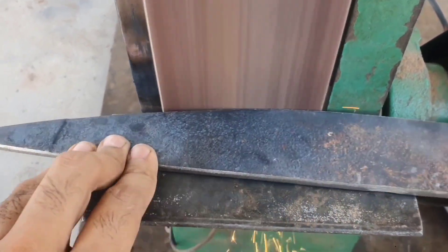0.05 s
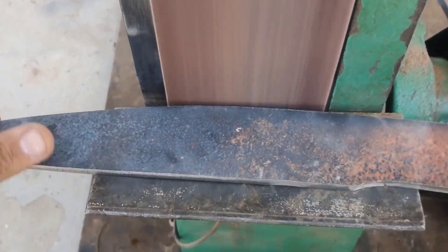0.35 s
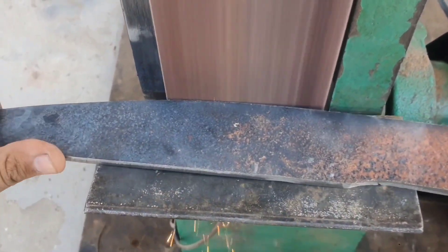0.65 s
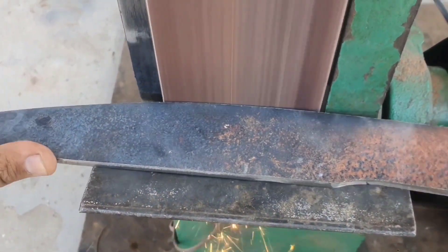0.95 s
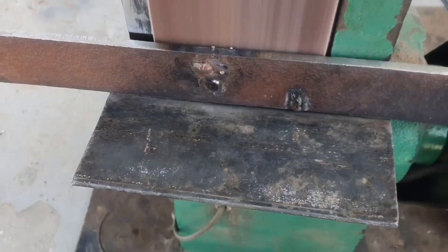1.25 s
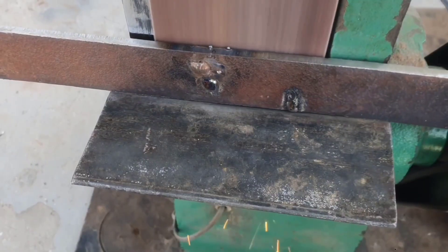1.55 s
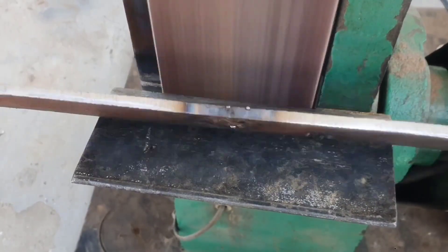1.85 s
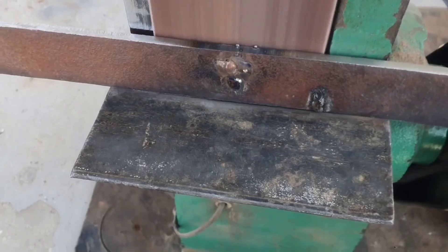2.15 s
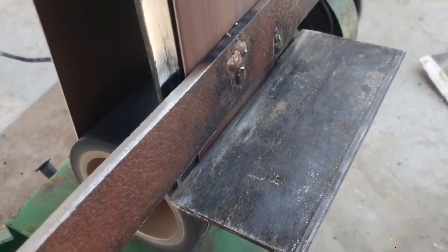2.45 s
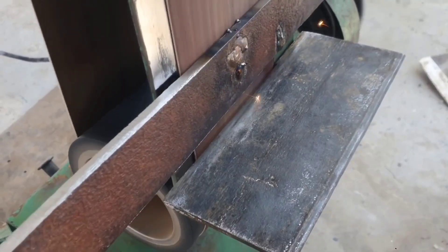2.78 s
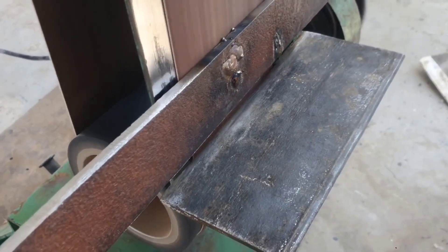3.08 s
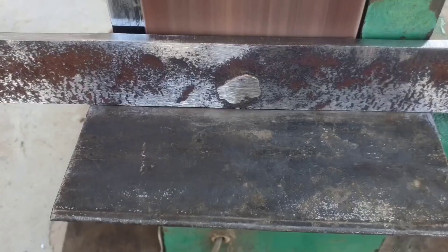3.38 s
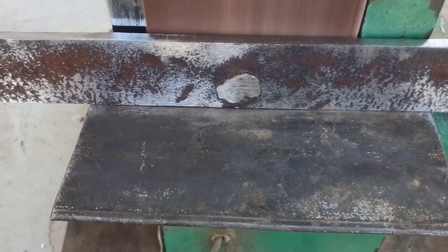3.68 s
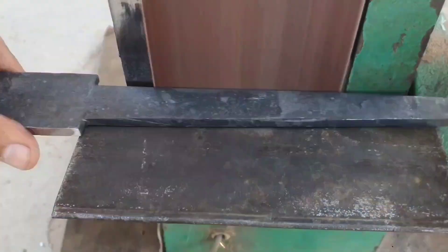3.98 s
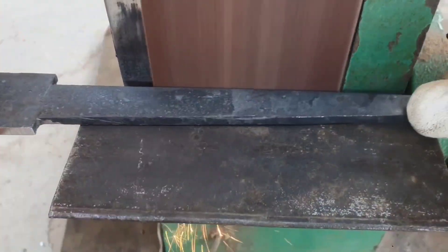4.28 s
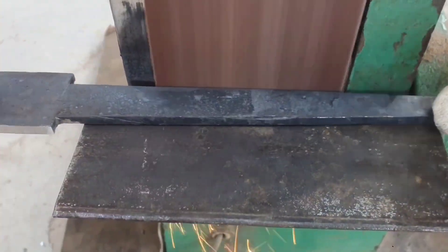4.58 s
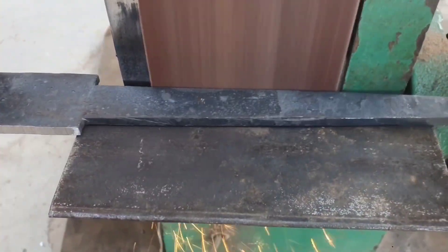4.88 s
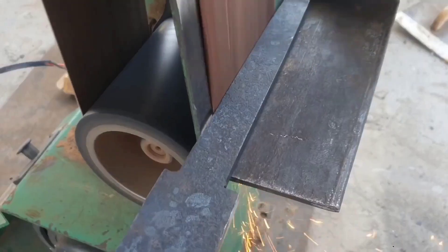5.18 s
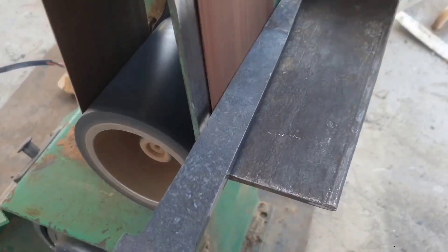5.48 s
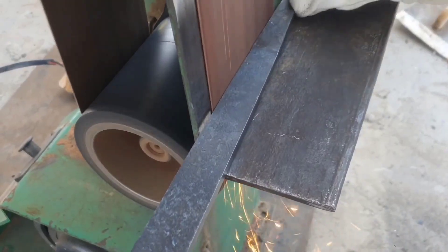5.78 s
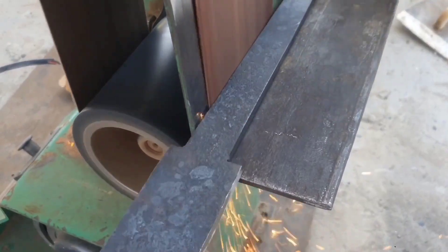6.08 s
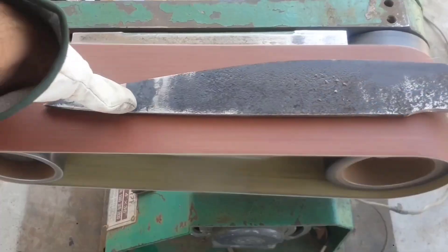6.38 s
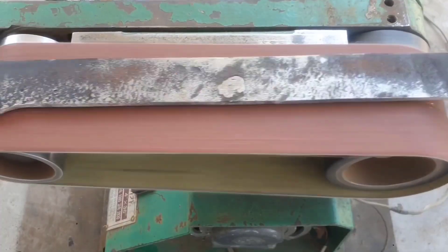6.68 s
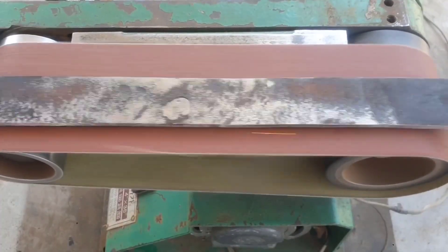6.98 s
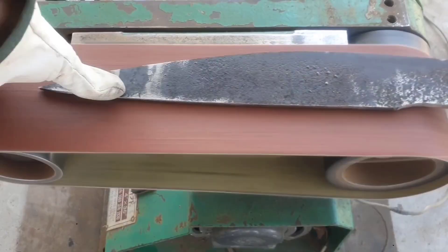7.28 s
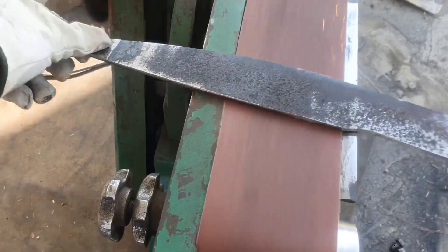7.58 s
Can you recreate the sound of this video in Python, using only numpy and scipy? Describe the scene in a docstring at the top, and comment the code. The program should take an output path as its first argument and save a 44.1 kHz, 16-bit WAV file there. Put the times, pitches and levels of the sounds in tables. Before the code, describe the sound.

Steel is ground on a running belt grinder, hissing and squealing with brief drops, then turning to a brighter hiss.

```python
"""Workshop, at a belt grinder. Steel is pressed into the upright belt over the work rest, touched to it
edge-on, laid on the flat run, then held across the belt. Abrasive grains tear at the steel in a rasping
hiss that throbs with each turn of the drive wheel. Friction makes the steel squeal and growl in its
resonances; the sound drops whenever the hand eases off. The machine's frame rumbles underneath."""
import sys
import numpy as np
from scipy import signal
from scipy.fft import rfft, irfft, next_fast_len
from scipy.io import wavfile
from scipy.ndimage import uniform_filter1d

SR = 44100
rng = np.random.default_rng(int(sys.argv[2]) if len(sys.argv) > 2 else 0)


def wav_out(sig):
    """Save sig, one row per channel (or a flat mono array), as 16-bit PCM at SR to the path in sys.argv[1]."""
    wavfile.write(sys.argv[1], SR, np.round(np.clip(np.atleast_2d(sig).T, -1, 1) * 32767).astype(np.int16))


N = 341334
TIME_S = np.arange(N) / SR
EDGE_START_S, FLAT_START_S, PAUSE_START_S, PAUSE_END_S = 5.2, 6.25, 7.484, 7.53

# presses into the upright belt: start_s, end_s, attack_s, fine_db, rasp_db, squeal_db, squeal_hz,
# squeal_pan_db, upper_mode_db, first_bite_db
PRESSES = [(0, 0.252, 0.0089, -33.5, -32, -21, 3134, 5, -7.5, -1.5),
           (0.493, 0.625, 0.032, -34, -30.5, -19, 3147, 5.5, -3.5, 10.5),
           (0.65, 0.727, 0.042, -31, -35, -30, 3150, 3, 1, -1.5),
           (0.744, 0.937, 0.038, -31, -29, -23.5, 3150, 7, -11, 0),
           (0.95, 1.262, .02, -33.5, -28.5, -21.5, 3145, 8, -8.5, -1),
           (1.277, 1.322, .014, -37, -35.5, -40, 3140, 10, -9, 2),
           (1.334, 1.704, .016, -28, -30, -21.5, 3200, 12, -9, 8.5),
           (1.999, 2.068, 0.17, -32.5, -29.5, -25.5, 3040, 10, -28, -5),
           (2.081, 2.417, 0.013, -29.5, -31, -21, 3176, 11.5, -12, 5.5),
           (2.436, 2.69, 0.031, -23.5, -29.5, -37, 3240, 1, -12, -9.5),
           (2.729, 3.485, 0.11, -25, -27, -30.5, 3210, -27, -9, 3.5),
           (3.492, 3.803, 0.046, -26.5, -28, -29, 3186, 17, -12.5, 2),
           (3.824, 4.058, 0.014, -39.5, -32.5, -31, 3035, 17, -29, 2),
           (4.099, 4.605, 0.068, -29.5, -26.5, -25.5, 3160, 11, -8, -0.5),
           (4.623, 5.187, 0.027, -30, -27.5, -24.5, 3170, 10, -11, 0)]
# between presses: fine_db, rasp_db, squeal_db, squeal_hz, squeal_pan_db, upper_mode_db
RESTING = (-46.5, -41, -37, 3065, 8, -17)
# position of the grinding point: time_s, pan_db
CONTACT_PAN = [(.6, 1), (1.1, 4.5), (2.6, 1.8), (5.2, 4)]
# light touches of the bar's edge: start_s, end_s, hiss_db, squeal_db
TOUCHES = [(5.2, 5.272, -40.5, -38.5), (5.29, 5.325, -41, -32), (5.34, 5.42, -40.5, -37.5),
           (5.44, 5.485, -38, -39), (5.605, 5.64, -37, -39), (5.65, 5.725, -40, -31.5),
           (5.74, 5.762, -42.5, -53), (5.865, 6.005, -37, -38.5), (6.02, 6.21, -38, -45)]
# swells: start_s, end_s, level_db
GROWLS = [(.11, .24, -30), (.49, .525, -27), (.6, .64, -27.5), (.82, .93, -25.5), (1.12, 1.18, -30),
          (1.42, 1.68, -37), (2.11, 2.35, -35), (2.74, 3.2, -35), (3.25, 3.43, -30.5), (4.195, 4.24, -27.5),
          (4.3, 4.6, -33), (4.7, 4.77, -27), (4.8, 4.92, -27.5), (5.0, 5.18, -35), (6.025, 6.21, -31)]  # steel falls into its lower mode
SURGES = [(6.285, 6.36, -28.5), (6.58, 6.63, -28), (6.68, 6.74, -28.5), (6.99, 7.08, -29),
          (7.285, 7.33, -27.5), (7.43, 7.455, -29.5)]  # blade bites deeper into the flat run
MOANS = [(7.67, 7.7, -37)]  # blade moans across the belt
# steel shakes its support: start_s, end_s, drone_db, rumble_rise_db
JUDDERS = [(.1, .18, -36, -1), (.48, .51, -35, 7), (.81, .96, -29.5, 6), (1.96, 2.035, -30, 8),
           (2.05, 2.068, -31.5, 12.5), (2.44, 2.455, -32, 8), (3.44, 3.8, -34.5, -0.5),
           (4.04, 4.085, -30, 2.5), (4.19, 4.28, -32.5, -3.5), (4.66, 4.95, -32.5, -1),
           (5.12, 5.18, -32, 1.5), (5.235, 5.275, -41.5, -8), (5.43, 5.47, -55, 0),
           (5.71, 5.735, -45.5, 10), (5.91, 5.95, -41.5, -5), (6.035, 6.205, -35, -4),
           (6.41, 6.46, -39, -2), (6.53, 6.61, -44.5, 1), (7.03, 7.08, -44, 11), (7.23, 7.28, -45.5, 2),
           (7.375, 7.44, -42, -2)]
# impacts on the belt: start_s, level_db
LANDINGS = [(.484, -11), (2.435, -31), (3.984, -22), (4.605, -28), (7.542, -21), (7.551, -27)]
SKIPS = [(0.18, -12), (5.279, -20), (5.290, -31), (5.369, -23), (5.397, -22), (5.663, -25)]
# briefly excited bending modes: peak_s, pitch_hz, level_db
GLINTS = [(1.06, 4280, -27), (2.45, 956, -34.5), (5.66, 4560, -38.5), (6.345, 5520, -28.5),
          (6.35, 6730, -32), (7.31, 3850, -32.5)]
# machine rumble: time_s, level_db
RUMBLE_LEVEL = [(0, -52.5), (1.8, -53), (2.6, -49), (3.3, -49.5), (3.7, -46), (5.17, -48), (5.24, -67),
                (5.4, -53), (5.53, -61.5), (7.52, -68), (7.58, -50.5)]

# noise spectra: freq_hz, density_db
FINE_SPECTRUM = [(3000, -23), (6500, -1), (9000, 0), (11300, -2.5), (13000, 2), (15500, 0)]
RASP_SPECTRUM = [(700, -31.5), (1500, -5), (2600, 3.5), (4000, 4.5), (5500, 1.5), (7000, -2.5),
                 (10000, -6.5), (15000, -73)]
DRONE_SPECTRUM = [(250, -28), (500, -12), (750, -5.5), (1000, 0), (1170, 2), (1450, 3.5), (1900, -3),
                  (3000, -9), (6000, -45)]
EDGE_SPECTRUM = [(700, -12), (1800, -4.5), (2700, -4), (3800, 0.5), (5200, -1), (6300, -3), (8000, -2.5),
                 (11500, -12.5), (13500, -3), (15500, -12)]
FLAT_SPECTRUM = [(1000, -21.5), (3000, -24), (5000, -0.5), (8000, -10.5), (9500, -.5), (12000, 2),
                 (15500, 0.5)]
BITE_SPECTRUM = [(800, -27), (1600, -15.5), (2250, -9), (2700, 2.5), (3300, -4), (4300, 1.5), (5500, -5),
                 (7000, 1.5), (10000, -17), (15000, -25)]
ACROSS_SPECTRUM = [(500, -21), (1700, -11), (2250, -7), (2700, 0), (3500, 2.5), (4000, -9), (4500, 3),
                   (5400, -2), (6300, 0.5), (10000, 0), (13000, 6.5), (15500, 1)]
RUMBLE_SPECTRUM = [(20, 1), (60, -3), (130, -3), (300, 2), (500, 1.5), (1000, 2.5), (3000, -51)]
# resonances of workpiece, work rest and frame: freq_hz, width_hz, relative_db
BAR_MODES = [(3735, 140, -12), (4320, 85, -18), (4910, 190, -16)]
EDGE_MODES = [(3750, 150, -11), (5030, 440, -10.5), (6870, 150, -21.5), (7830, 160, -16.5)]
BLADE_MODES = [(5300, 260, -15), (6730, 170, -14), (8100, 720, -3)]
ACROSS_MODES = [(201, 22, -34), (337, 13, -24), (8200, 470, -8.5)]
REST_MODES = [(1120, 230, -11)]
FRAME_MODES = [(123, 75, -12)]
# left-right likeness of the noise: freq_hz, correlation
COHERENCE = [(60, 0.52), (300, .45), (700, 0.76), (1400, 0.53), (3100, 0.046), (7000, 0.064),
             (15000, 0.018)]


def upright_belt(throb):
    """Bar on the work rest: cutting hiss, drone of the rest, squeal and growl of the steel."""
    fine_db, rasp_db, squeal_db, squeal_hz, squeal_pan_db, upper_db = hand_pressure()
    load_db = rasp_db + 30  # above the usual rasp
    drone_db, _ = judder_levels(-39.5 + 0.26 * load_db)
    idle_growl_db = -42.5 + 0.83 * load_db
    growl_db = growl_level(idle_growl_db)
    squeal_db = squeal_db - 0.073 * (growl_db - idle_growl_db)  # growl steals from squeal
    pan_db = curve(CONTACT_PAN)
    cutting = grains(throb, throb_db=0.2, rough_db=2.0, per_s=5500, size_db=6.5, share=0.19)
    tearing = grains(throb, throb_db=-0.17, rough_db=1.5)
    shaking = grains(throb, throb_db=1.5, rough_db=2.5)
    sticking = grains(throb, throb_db=1.0, rough_db=1.5)
    fine = from_db(fine_db + hand_waver(1.2)) * pan(colour(cutting, FINE_SPECTRUM), pan_db * 0.8)
    upper_mode = from_db(upper_db + hand_waver(2.5)) * pan(resonate(cutting, 5610, 210), 0.65)
    rasp_gain = from_db(rasp_db + hand_waver(1.5))
    bar_ring = ringing(shaking, BAR_MODES, wander_db=3.5)
    rasp = rasp_gain * pan(colour(tearing, RASP_SPECTRUM) + bar_ring + upper_mode, pan_db)
    rest_ring = ringing(cutting, REST_MODES, wander_db=3.5)
    drone = from_db(drone_db) * pan(colour(shaking, DRONE_SPECTRUM) + 1.24 * rest_ring, 0.81)
    looseness = np.clip((-22 - squeal_db) / 10, 0, 1)  # a weak squeal has not locked on: pitch flutters
    squeal_hz = squeal_hz * (1 + 0.023 * looseness * drift(500))
    squeal = friction_mode(sticking, squeal_hz, width_hz=115, skirt_hz=430, apart=0.27, lead_rad=1.2)
    growl = friction_mode(sticking, 2150, width_hz=240, skirt_hz=650, apart=0.35, lead_rad=0.6)
    growl = from_db(growl_db + 1.5 * drift(12)) * pan(growl, 4.8)
    squeal = from_db(squeal_db + hand_waver(0.83)) * pan(squeal, squeal_pan_db)
    return (fine + rasp + drone + squeal + growl) * gate(0, EDGE_START_S)


def flat_belt(throb, lying_db=-31, landing_s=0.035):
    """Blade face down, damped by the belt: bright hiss, coarser where it bites."""
    bite_db, = held(SURGES, [lying_db], attack_s=0.012, release_s=0.012)
    hiss_db = -25.5 + 0.15 * (bite_db - lying_db) + hand_waver(0.7)
    drone_db, _ = judder_levels(idle_db=-49.5)
    cutting = grains(throb, throb_db=1.3, rough_db=0.5, per_s=7000, size_db=2.5, share=0.28)
    tearing = grains(throb, throb_db=0.8, rough_db=-0.5)
    scrape = colour(tearing, BITE_SPECTRUM) + ringing(cutting[::-1], BLADE_MODES, wander_db=3.5)
    # the blade rocks: a shifting echo from the gap beneath hollows the scrape
    gap_s = 0.00052 * (1 + 0.16 * drift(9))
    scrape = steady(scrape + 0.45 * np.array([delay(side, gap_s) for side in scrape]))
    hiss = from_db(hiss_db) * pan(colour(cutting, FLAT_SPECTRUM), 1.3)
    bite = from_db(bite_db + hand_waver(0.5)) * pan(scrape, 7.6)
    hum = friction_mode(tearing, 880, width_hz=150, skirt_hz=700, apart=0.55)
    drone = from_db(drone_db) * pan(colour(cutting, DRONE_SPECTRUM) + 0.5 * hum, 4.2)
    landing = from_db(-25 * ramp_down(FLAT_START_S, landing_s))
    return (hiss + bite + drone) * landing * gate(FLAT_START_S, PAUSE_START_S)


def edge_touch(throb):
    """Lightly held bar chatters: thin hiss, stuttering squeal, then a growl that shakes the rest."""
    hiss_db, squeal_db = held(TOUCHES, [-50, -59], attack_s=0.03, release_s=0.017)
    drone_db, _ = judder_levels(idle_db=-60)
    cutting = grains(throb, throb_db=1.3, rough_db=1.5, per_s=2900, share=0.25)
    shaking = grains(throb, throb_db=1.4, rough_db=2.2)
    chatter = grains(throb, throb_db=3.5, rough_db=1.0)
    overtones = ringing(shaking, EDGE_MODES, wander_db=2.5)
    hiss_gain = from_db(hiss_db + hand_waver(0.7, rate_hz=50))
    hiss = hiss_gain * pan(colour(cutting, EDGE_SPECTRUM) + overtones, 0.99)
    rest_ring = friction_mode(chatter, 1090, width_hz=210, skirt_hz=480, apart=0.35, lead_rad=0.3)
    drone = from_db(drone_db) * (0.28 * colour(shaking, DRONE_SPECTRUM) + 0.9 * rest_ring)
    squeal = friction_mode(chatter, 3236, width_hz=130, skirt_hz=550, apart=0.37)
    growl = friction_mode(chatter, 2134, width_hz=110, skirt_hz=430, apart=0.34, lead_rad=0.8)
    squeal = from_db(squeal_db) * pan(squeal, 26)
    growl = from_db(growl_level(idle_db=-67)) * pan(growl, 1.2)
    return (hiss + drone + squeal + growl) * gate(EDGE_START_S, FLAT_START_S)


def blade_across(throb, settle_s=0.065):
    """Blade held at one end across the belt: hiss, low hum, high ring, a brief moan."""
    hiss_db = -24 - 7.5 * ramp_down(PAUSE_END_S, settle_s)
    moan_db, = held(MOANS, [-59], attack_s=0.047, release_s=0.047)
    cutting = grains(throb, throb_db=-0.5, rough_db=1.5)
    ring = ringing(cutting[::-1], ACROSS_MODES, wander_db=1)
    hiss = pan(colour(cutting, ACROSS_SPECTRUM), 1.5) + pan(ring, 5.4)
    moan = friction_mode(cutting, 1350, width_hz=260, skirt_hz=700, apart=0.29)
    return (from_db(hiss_db) * hiss + from_db(moan_db) * moan) * gate(PAUSE_END_S, np.inf)


def grains(throb, throb_db, rough_db, per_s=6000, size_db=3.5, share=0.14):
    """Small grains hiss; large ones crack, with `share` of the power. Both follow the contact force."""
    hits = rng.random(N) < per_s / SR
    sizes = from_db(size_db * np.minimum(rng.exponential(1, N), 5))
    cracks = hits * sizes * rng.standard_normal((2, N))
    scratch = np.sqrt(share) * cracks / cracks.std() + np.sqrt(1 - share) * rng.standard_normal((2, N))
    knots_s = TIME_S[::50]
    roughness = np.interp(TIME_S, knots_s, rng.standard_normal(len(knots_s)))
    return scratch * from_db(throb_db * throb + rough_db * roughness)


def friction_mode(force, pitch_hz, width_hz, skirt_hz, apart, lead_rad=0.61, saturation=0.12):
    """Friction rings one bending mode in ragged bursts; the left side leads in phase."""
    carrier = np.exp(2j * np.pi * np.cumsum(pitch_hz * np.ones(N)) / SR)
    sides = np.array([[1], [-1]])
    mode_pole, skirt_pole = np.exp(-np.pi * np.array([width_hz, skirt_hz]) / SR)
    drive = force[0] + apart * force[1] * sides
    swing = signal.lfilter([1 - mode_pole], [1, -mode_pole], drive / carrier)
    swing = swing / (np.abs(swing) + 1e-12) ** saturation  # friction feeds weak swings, curbs strong ones
    swing = signal.lfilter([1 - skirt_pole], [1, -skirt_pole], swing)
    return steady((swing * carrier * np.exp(0.5j * lead_rad * sides)).real, window_samples=900)


def ringing(force, modes, wander_db):
    """Modes swell and fade as the contact slides along the steel."""
    return sum(resonate(force, freq_hz, width_hz) * from_db(level_db + wander_db * drift(7))
               for freq_hz, width_hz, level_db in modes)


def wheel_throb(wheel_hz=76.3, unevenness=0.7):
    """A high spot on the wheel pushes the belt into the steel once a turn; unit spread."""
    turns = np.cumsum(wheel_hz * (1 + 0.011 * drift(3) + 0.042 * drift(70))) / SR
    push = np.exp(np.cos(2 * np.pi * turns)) * (1 + unevenness * drift(60))
    return (push - push.mean()) / push.std()


def hand_pressure(wear_s=0.042):
    """Presses rise, hold and let go; as the first bite wears smooth, hiss gives way to squeal."""
    holds = [(start_s, end_s, *values) for start_s, end_s, _, *values, _ in PRESSES]
    attacks_s = np.array([press[2] for press in PRESSES])
    fine_db, rasp_db, squeal_db, *mode_curves = held(holds, RESTING, attacks_s, release_s=0.022)
    bite_db = sum(db * gate(start_s - attack_s / 2, end_s) * np.exp(-np.abs(TIME_S - start_s) / wear_s)
                  for start_s, end_s, attack_s, *_, db in PRESSES)
    return fine_db + bite_db, rasp_db, squeal_db - 0.41 * bite_db, *mode_curves


def hand_waver(spread_db, rate_hz=22):
    """Level wander from an unsteady hand, in dB."""
    return spread_db * drift(rate_hz)


def growl_level(idle_db):
    """Level of the steel's lower mode, in dB."""
    return held(GROWLS, [idle_db], attack_s=0.022, release_s=0.025)[0]


def judder_levels(idle_db):
    """Steel shakes its support: drone level and rumble rise, in dB."""
    return held(JUDDERS, [idle_db, 0], attack_s=0.046, release_s=0.039)


def landing_knocks(decay_s=0.0039):
    """Steel lands on the belt: a short, harsh burst of grains."""
    envelope = sum(from_db(level_db) * (TIME_S >= start_s) * np.exp(-np.abs(TIME_S - start_s) / decay_s)
                   for start_s, level_db in LANDINGS)
    noise = rng.standard_normal((2, N))
    return envelope * pan(colour(noise, RASP_SPECTRUM) + 0.68 * colour(noise, FINE_SPECTRUM), 3) / 2


def skip_pings(pitch_hz=3190, decay_s=0.0061):
    """Each skip on the belt rings the bending mode once."""
    pings = np.zeros(N)
    for start_s, level_db in SKIPS:
        age_s = np.maximum(TIME_S - start_s, 0)
        envelope = from_db(level_db) * np.exp(-np.minimum(age_s / decay_s, 20))
        pings += envelope * np.sin(2 * np.pi * pitch_hz * age_s)
    return pan(pings, 16)


def glints(width_ratio=0.033, swell_s=0.03):
    """The sliding contact passes points where another bending mode rings up and fades."""
    force = rng.standard_normal((2, N))
    rings = np.zeros((2, N))
    for peak_s, pitch_hz, level_db in GLINTS:
        swell = from_db(level_db) * np.exp(-((TIME_S - peak_s) / swell_s) ** 2)
        rings += swell * resonate(force, pitch_hz, width_ratio * pitch_hz)
    return pan(rings, 7.5)


def plate_echoes(x, delays_s=(0.0013, 0.0021, 0.0034), gain=0.27, sway=0.045):
    """Rest, platen and frame are small and reflect only treble; the paths shift as the work moves."""
    echoes = [sum(delay(side, lag_s * (1 + sway * drift(3))) for lag_s in delays_s) for side in x]
    return gain * signal.sosfilt(signal.butter(2, 3800, "high", fs=SR, output="sos"), echoes)


def frame_rumble(throb):
    """The running machine rumbles, and booms when the steel shakes it hard."""
    _, rise_db = judder_levels(idle_db=0)
    level_db = curve(RUMBLE_LEVEL) + rise_db
    shaking = grains(throb, throb_db=2.5, rough_db=1.5)
    boom = from_db(1.8 * (level_db + 43)) * ringing(shaking[[0, 0]], FRAME_MODES, wander_db=1.5)
    return from_db(level_db) * pan(colour(shaking, RUMBLE_SPECTRUM) + boom, -7.5)


def colour(x, spectrum):
    """Shape two unrelated signals into a unit-rms pair, alike in the bass, apart in the treble."""
    size = next_fast_len(N)
    freqs_hz = np.maximum(np.fft.rfftfreq(size, 1 / SR), 1)
    mid, side = rfft(x, size) * from_db(at_hz(spectrum, freqs_hz))
    correlation = at_hz(COHERENCE, freqs_hz)
    mid, side = mid * np.sqrt(1 + correlation), side * np.sqrt(1 - correlation)
    return steady(irfft([mid + side, mid - side], size)[:, :N])


def resonate(x, freq_hz, width_hz):
    """Two-pole resonance, levelled."""
    radius = np.exp(-np.pi * width_hz / SR)
    feedback = [1, -2 * radius * np.cos(2 * np.pi * freq_hz / SR), radius ** 2]
    return steady(signal.lfilter((1 - radius ** 2) / 2 * np.array([1, 0, -1]), feedback, x))


def held(rows, idle, attack_s, release_s):
    """One curve per value of (start_s, end_s, values...) rows: glide from idle, hold, glide back."""
    curves = np.array([value * np.ones(N) for value in idle])
    for (start_s, end_s, *values), rise_s in zip(rows, attack_s * np.ones(len(rows))):
        span = slice(*np.searchsorted(TIME_S, [start_s - rise_s, end_s + release_s]))
        inside = np.minimum((TIME_S[span] - start_s) / rise_s, (end_s - TIME_S[span]) / release_s)
        curves[:, span] += np.clip(1 + inside, 0, 1) * (np.array(values)[:, None] - curves[:, span])
    return curves


def steady(x, window_samples=2600):
    """Hold a pair's mid signal at rms 1, keeping fast flutter."""
    return x / np.sqrt(np.abs(uniform_filter1d(x.mean(axis=0) ** 2, size=window_samples)) + 1e-20)


def pan(x, left_db):
    """Lean a pair left at constant power."""
    gains = from_db([left_db / 2, -left_db / 2]).reshape(2, -1)
    return x * gains / np.sqrt(np.mean(gains ** 2, axis=0))


def drift(rate_hz):
    """Random wander, unit spread."""
    knots = rng.standard_normal(8000)
    return np.interp(TIME_S * rate_hz, np.arange(len(knots)), knots) * np.sqrt(3 / 2)


def gate(start_s, end_s):
    """Gate with 2 ms edges."""
    return uniform_filter1d(((TIME_S >= start_s) & (TIME_S < end_s)) * 1.0, size=100)


def ramp_down(start_s, length_s):
    return np.clip(1 - (TIME_S - start_s) / length_s, 0, 1)


def delay(x, delay_s):
    return np.interp(TIME_S - delay_s, TIME_S, x)


def curve(points):
    return np.interp(TIME_S, *np.transpose(points))


def at_hz(points, freqs_hz):
    knots_hz, values = np.transpose(points)
    return np.interp(np.log(freqs_hz), np.log(knots_hz), values)


def from_db(db):
    return 10 ** (np.asarray(db) / 20)


def scene():
    """Four ways of grinding on one machine, with a brief dip before the last."""
    throb = wheel_throb()
    grinding = upright_belt(throb) + edge_touch(throb) + flat_belt(throb) + blade_across(throb)
    steel = grinding + landing_knocks() + skip_pings() + glints()
    pause = gate(PAUSE_START_S, PAUSE_END_S)
    return (steel + plate_echoes(steel) + frame_rumble(throb)) * (1 - pause + pause * from_db(-12))


def record(dry):
    """Steep low-pass."""
    cutoff_hz = 15750
    return signal.sosfilt(signal.ellip(12, 0.1, 90, cutoff_hz, fs=SR, output="sos"), dry)


dry = scene()
out = record(dry)
wav_out(out)
```